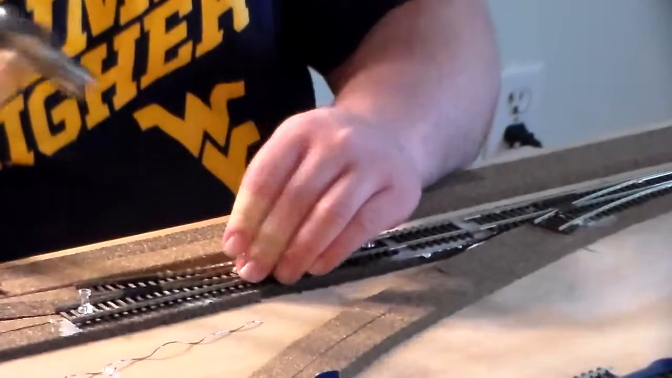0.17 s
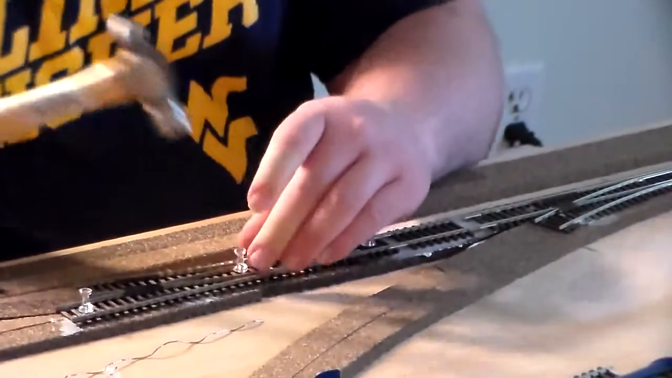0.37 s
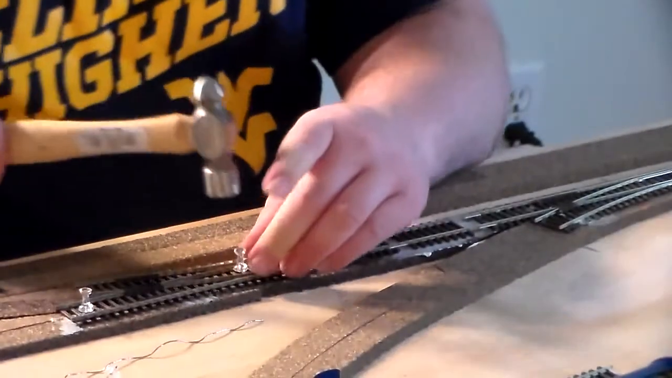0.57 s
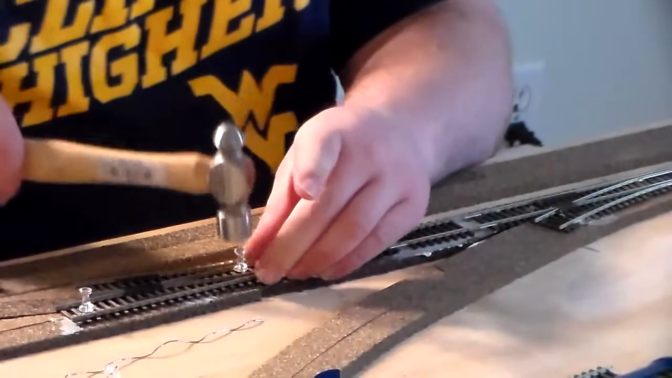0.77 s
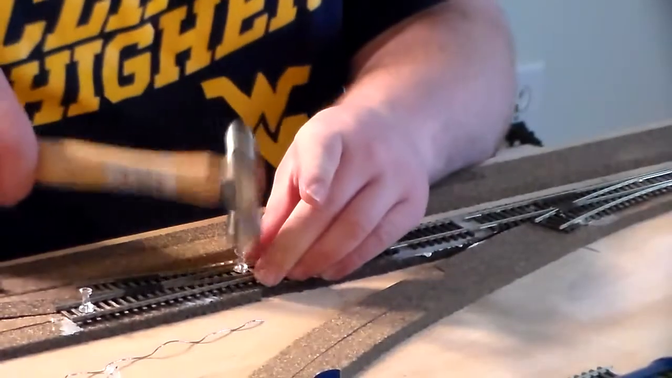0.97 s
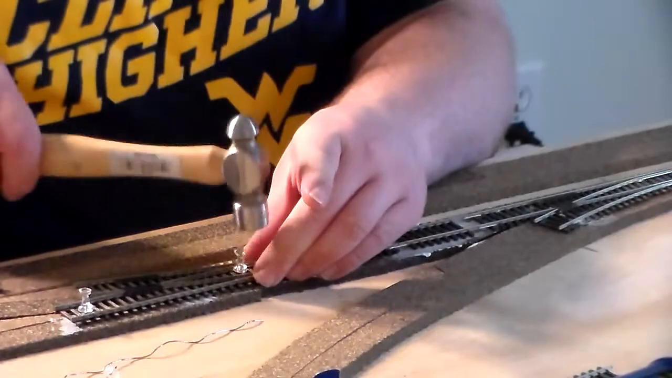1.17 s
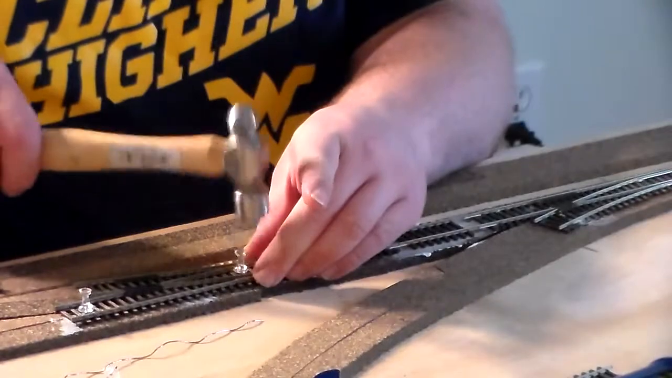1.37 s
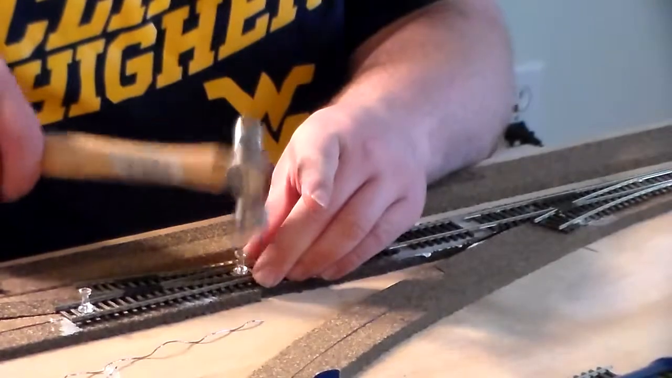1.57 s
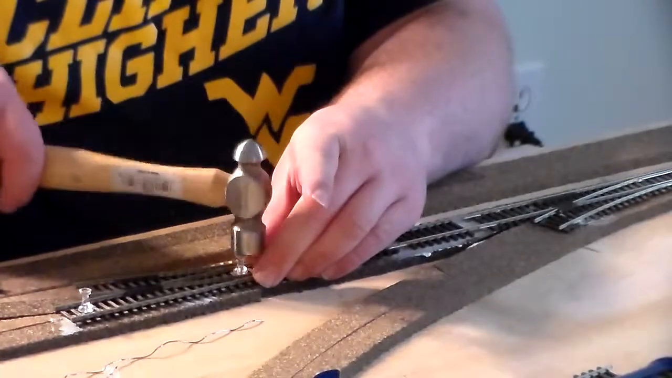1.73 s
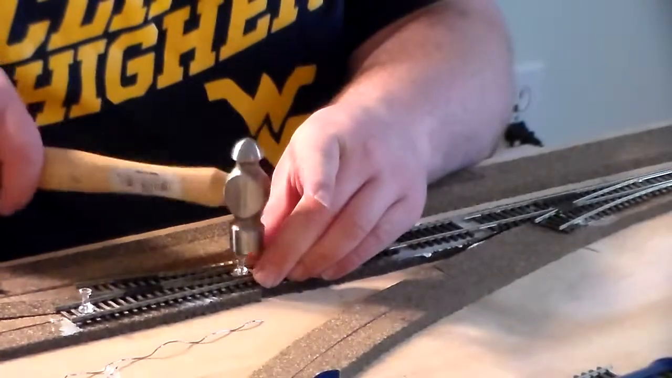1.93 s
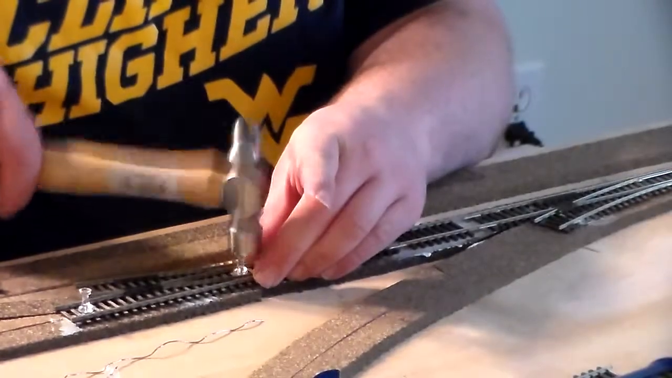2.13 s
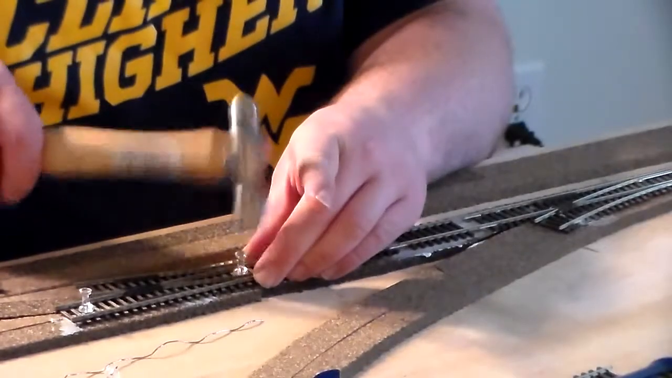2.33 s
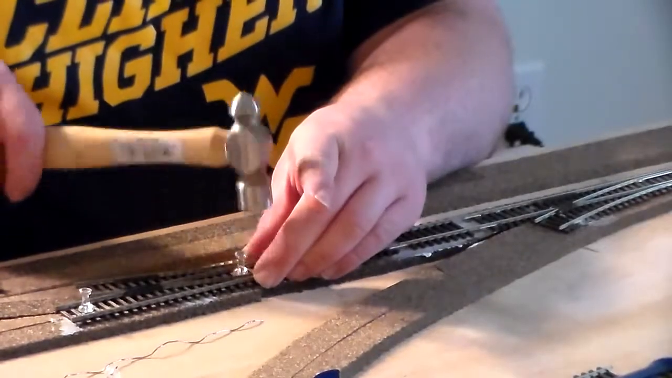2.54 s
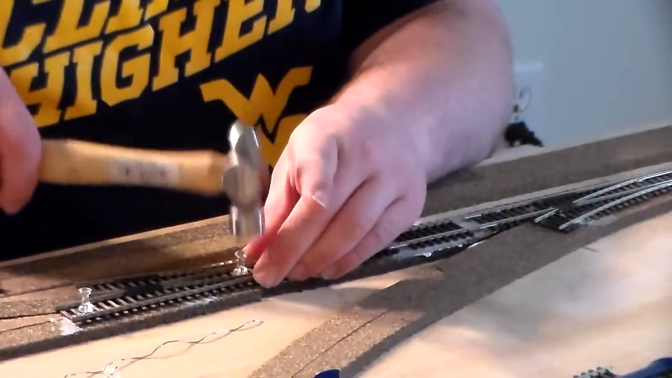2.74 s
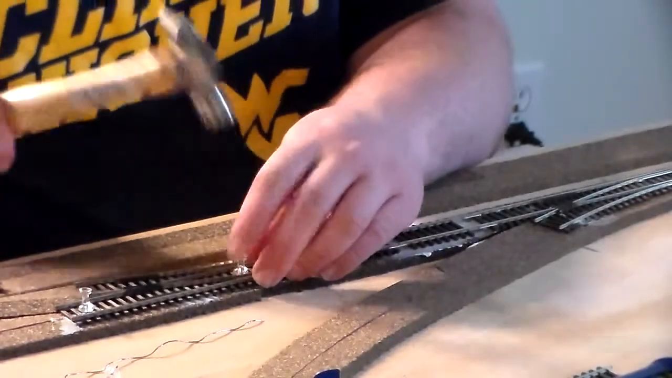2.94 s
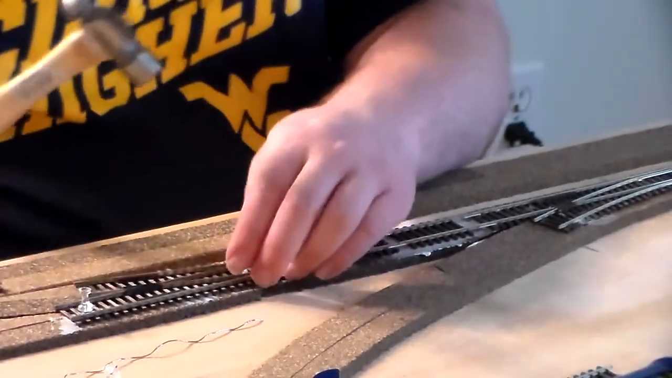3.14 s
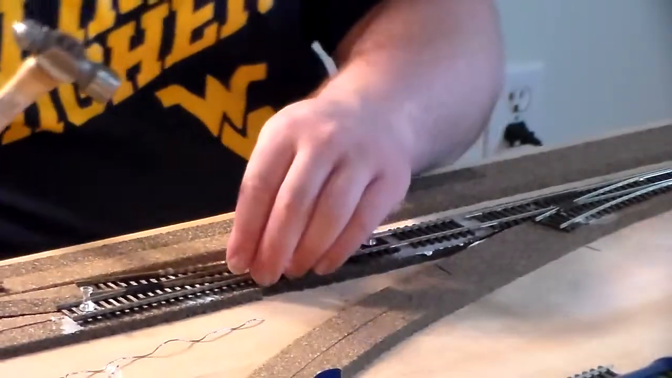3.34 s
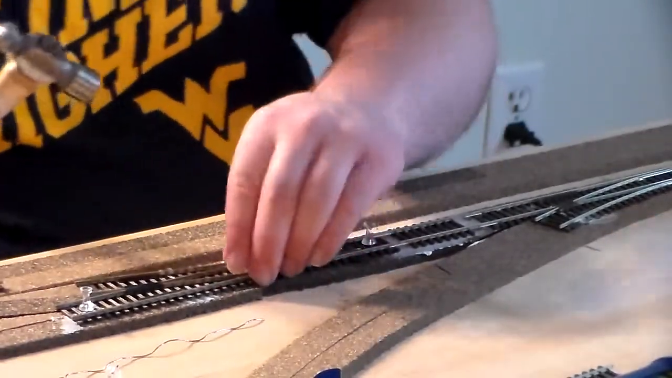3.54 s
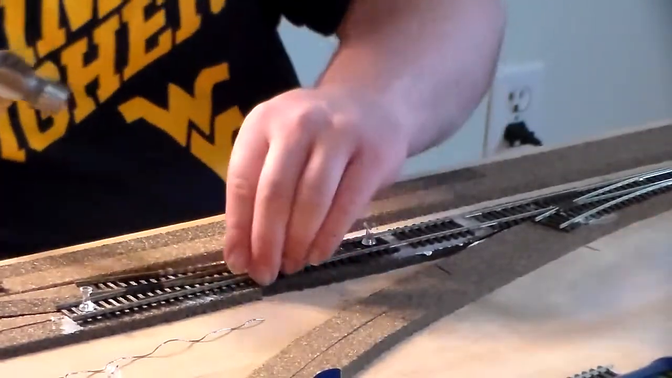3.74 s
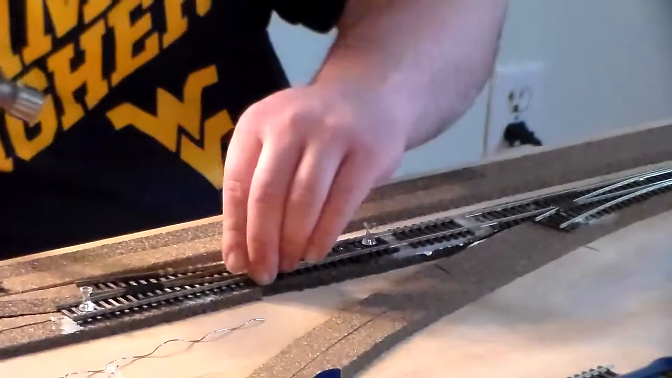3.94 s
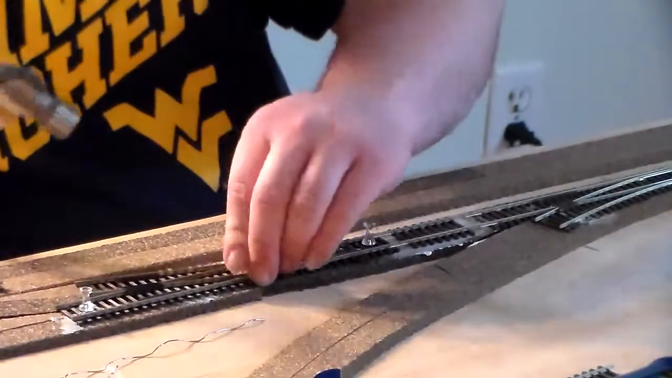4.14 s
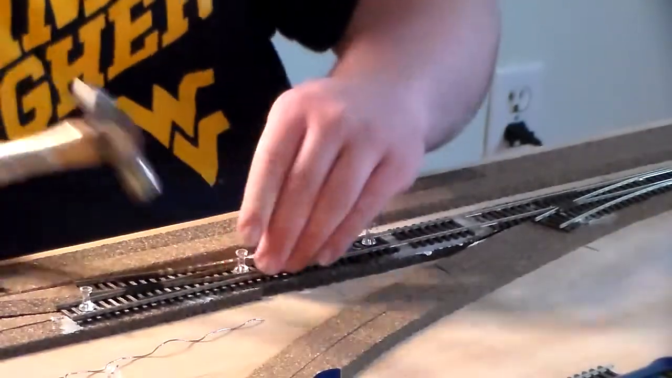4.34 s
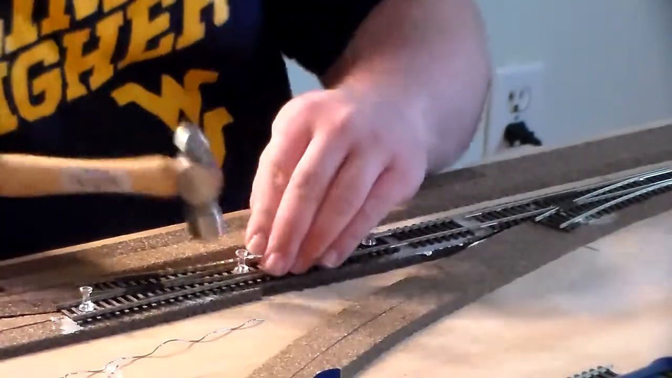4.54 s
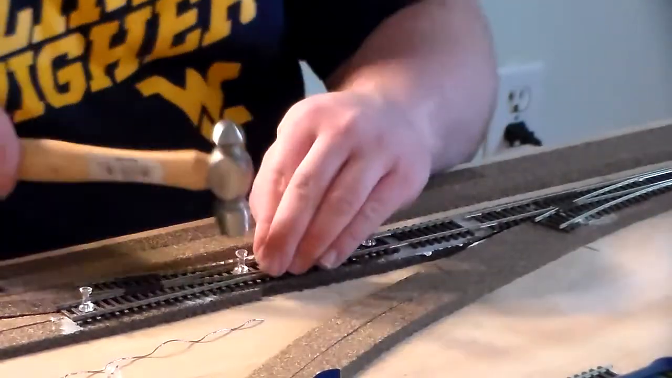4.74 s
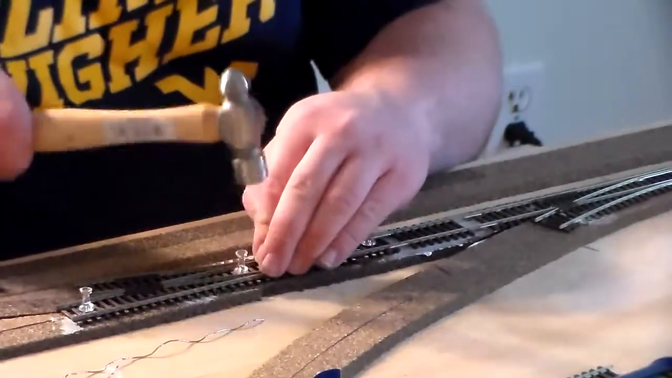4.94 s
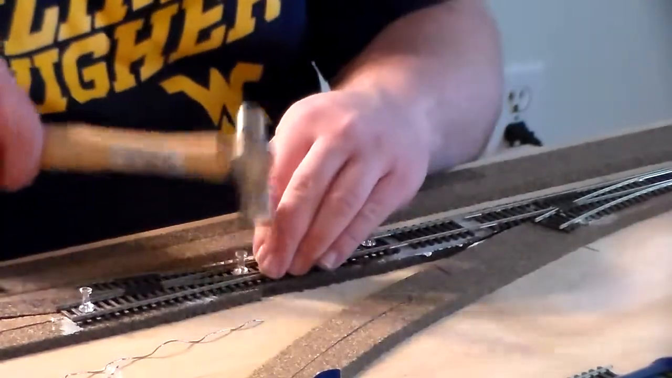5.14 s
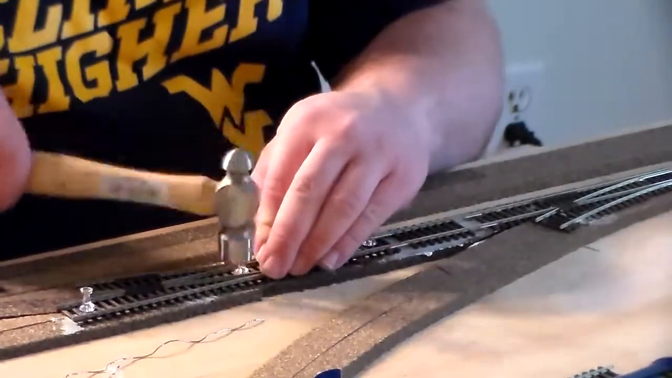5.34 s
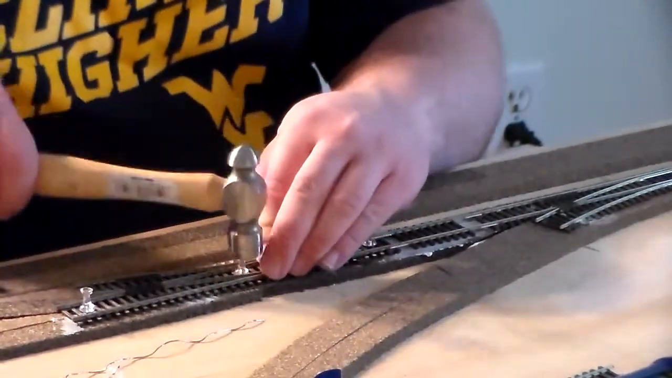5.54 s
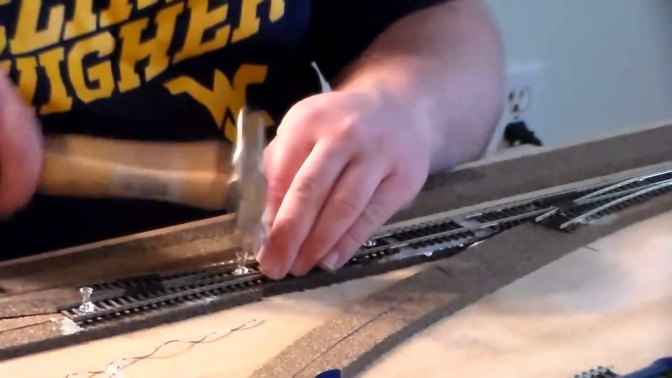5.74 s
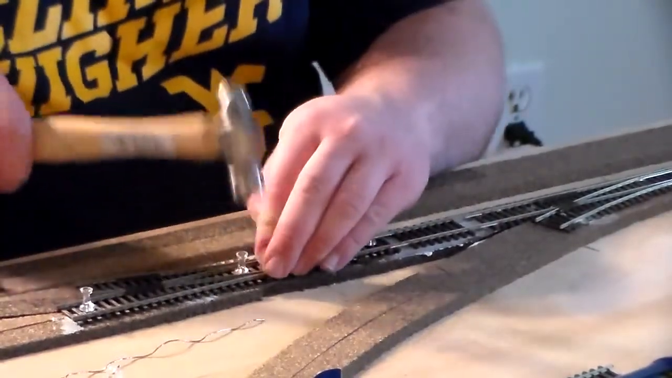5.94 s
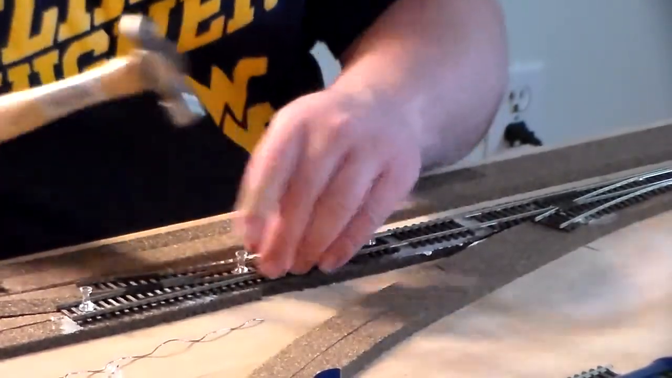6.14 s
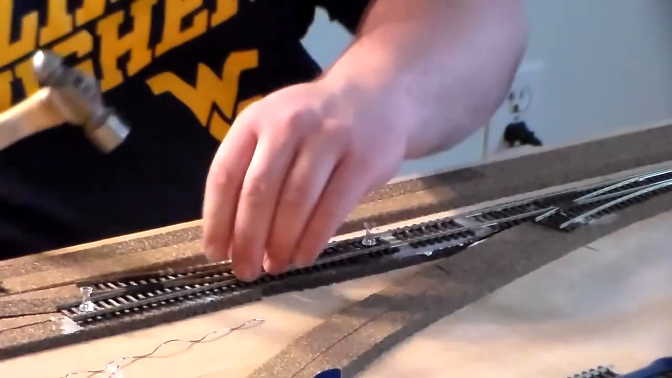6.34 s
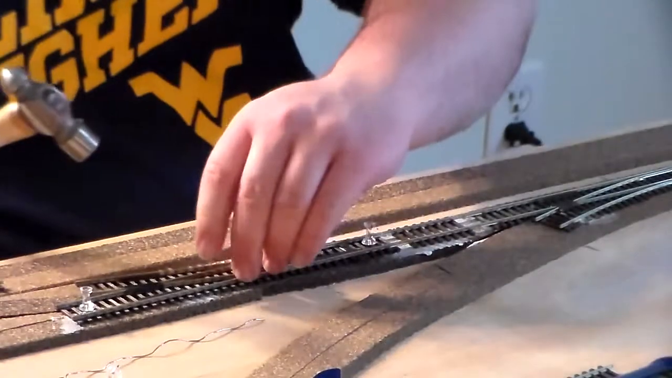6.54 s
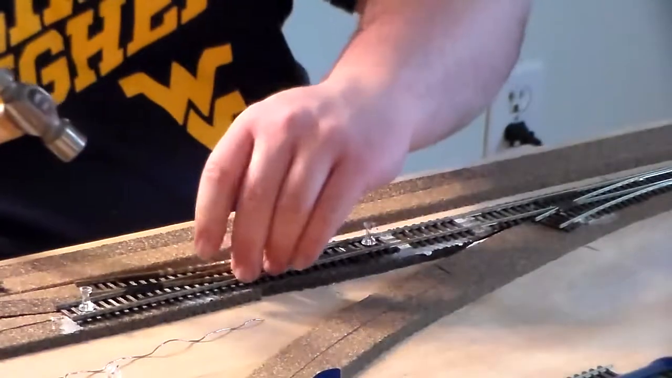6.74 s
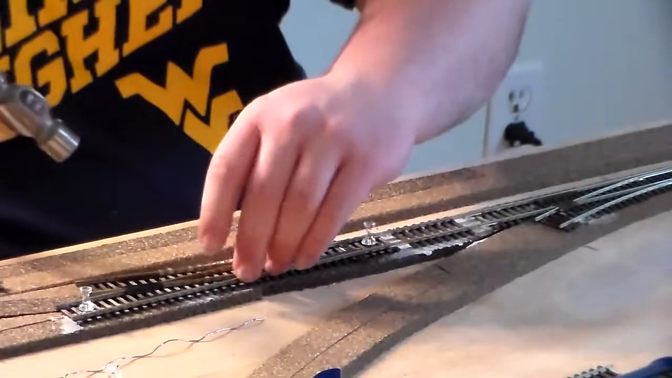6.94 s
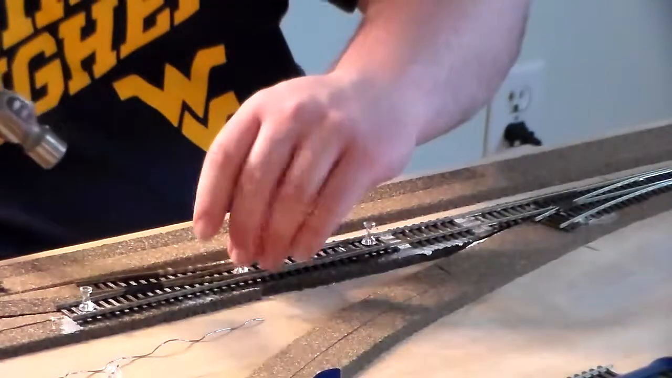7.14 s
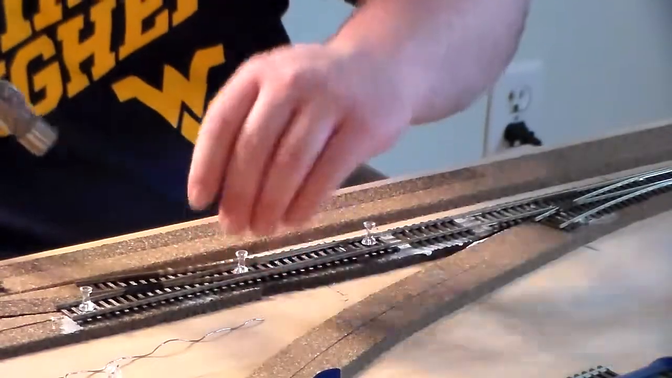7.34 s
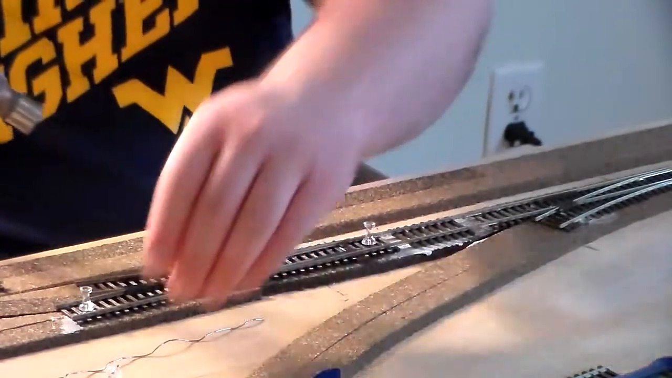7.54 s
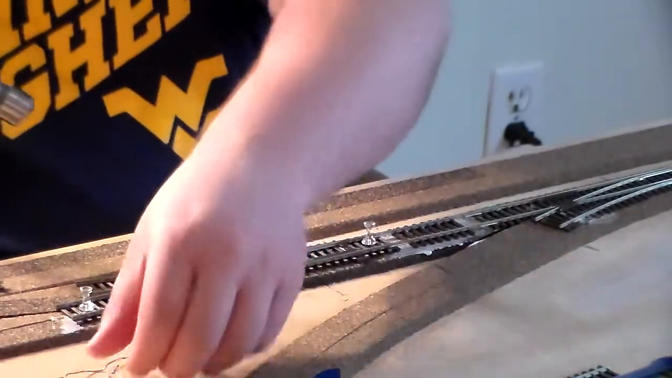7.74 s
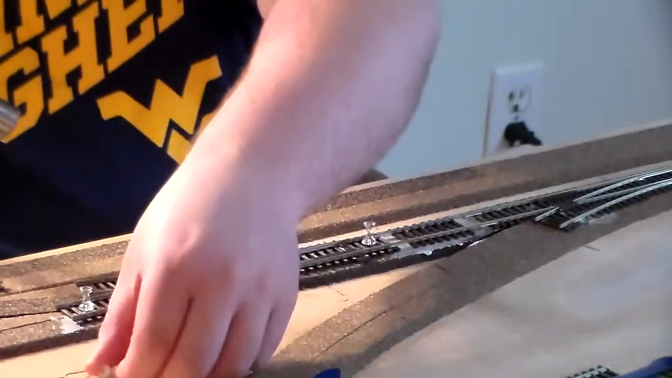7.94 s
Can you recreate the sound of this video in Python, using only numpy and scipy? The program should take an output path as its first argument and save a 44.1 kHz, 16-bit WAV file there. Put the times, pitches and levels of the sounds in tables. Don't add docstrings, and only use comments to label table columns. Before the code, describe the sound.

A small indoor room holds a faint steady low hum, a wavering fan and soft moving air. From 0 to 1 second, fingers quietly flick and scrape a plastic pin on cork. A small steel hammer lands two lighter, duller taps at about 1.2 and 1.4 seconds, with tiny bounces and a rubbing rattle. Six quick, even blows follow from 1.6 to 2.8, each a bright plastic snap over a short hollow plywood thud, with loose clatter, faint metallic ringing and a brief room tail. Around 3.1 come small clicks and a scuff, then near quiet with slight finger noises until 4.8. Four harder blows strike at 5.2, 5.5, 5.7 and 5.9, the third heaviest, the last duller-ticked. A scrape and small clicks at 6.1 give way to hum and air, with a faint flick near 7.8. The close microphone's background ducks after blows and swells back.

```python
import sys
import numpy as np
from scipy import signal
from scipy.fft import rfft, irfft
from scipy.io import wavfile
from scipy.ndimage import uniform_filter1d

SR = 44100
rng = np.random.default_rng(int(sys.argv[2]) if len(sys.argv) > 2 else 0)


def int16_out(signal):
    q = np.round(np.clip(np.atleast_2d(signal).T, -1, 1) * 32767)
    wavfile.write(sys.argv[1], SR, q.astype(np.int16))


def invert_db(x):
    u = np.asarray(x, float) / 20
    return 10 ** u


N = 352956

# [Hz, dB rms]
HUM_PARTIALS = [(119.8, -59), (240.7, -68.5), (363, -73), (485, -75.5), (332, -79.5), (439, -74)]
# [Hz, Hz, dB]
FAN_ORDERS = [
    (29.5, 2.3, -62),
    (59.6, 0.37, -59.5),
    (99.3, 8.5, -90),
]
# [Hz, dB]
AIR_COLOUR = [(12, 3.5), (25, 8.5), (70, -3.5), (150, -6.5), (450, -10), (700, -15.5), (1200, -18),
              (2500, -21), (5000, -24.5), (15000, -32.5)]
# [Hz, 0 to 1]
AIR_LIKENESS = [(60, 0.71), (180, 0.69), (540, 0.6), (1640, 0.36), (4950, 0.034), (14900, 0.0)]
# [Hz, dB]
STEREO_LEAN = [(60, 1.5), (240, 0.5), (950, 0), (3750, -1.5), (14900, -0.5)]
# [Hz, s]
ROOM_DECAY = [(150, 0.47), (400, 0.35), (1000, 0.33), (2500, 0.37), (6000, 0.37), (12000, 0.31)]

# [s, dB, dB, dB, dB]
FIRST_TAPS = [
    (1.1629, -31.5, -54, 3.5, 16.6),
    (1.4014, -27, -54, 11, 13),
]
FIRST_PIN = [(1.6182, -23, -18, 3.5, -6.5), (1.8572, -24.5, -17.5, 5.5, -6), (2.0898, -23, -19.5, 5, -3.5),
             (2.318, -22, -19.5, 3, -1), (2.5469, -21, -19, 2, 5), (2.7702, -22.5, -19, 0.5, 6)]
SECOND_PIN = [
    (5.1966, -21, -16.5, -1.5, 3.1),
    (5.4603, -16, -16.5, -8.5, 2.1),
    (5.7002, -12, -14, -9, 3.2),
    (5.9264, -15, -24, -5.5, 2.5),
]
# [Hz, dB per Hz]
CLATTER_TAPS = [(59, -44), (100, 24.5), (345, 3), (502, 17), (923, -1.5), (2050, -25), (2470, -44),
                (3250, -23.5), (12400, -40.5), (14100, -39), (15000, -80)]
CLATTER_FIRST = [(59, -37), (100, 23), (184, 3), (416, 7.5), (923, -20.5), (1660, -24.5), (2370, -30),
                 (2800, -27.5), (11200, -52), (14100, -55), (15000, -85)]
CLATTER_SECOND = [(59, -32), (100, -16), (140, 3.5), (324, 10), (492, 16.5), (780, -11.5), (3530, -24),
                  (7670, -38), (10300, -38), (13200, -43), (15000, -75)]
# [Hz, dB, s]
PLYWOOD_MODES = [(165.5, -1.5, 0.27), (194.6, -4.5, 0.16), (199.9, 1, 0.2), (218.2, -0.5, 0.14),
                 (235, -8.5, 0.25), (276, -7, 0.24), (299.6, -2.5, 0.19), (341, -7, 0.23), (378, 2, 0.18),
                 (406.6, 3, 0.22), (422, -6.5, 0.35), (461.6, 2, 0.19), (511.3, -2, 0.19),
                 (527.3, -5, 0.29), (551, -17, 0.19), (566, -16, 0.39), (593, -44, 1), (662, -29, 0.67),
                 (651, -15, 0.4), (657, -11, 0.18), (706, -5, 0.18), (751, -16, 0.43), (845, -20.5, 0.3),
                 (857, -18, 0.26), (946, -17.5, 0.24)]
# [Hz, dB, s]
KNOCK_MODES = [(400, -5, 0.028), (2530, 1, 0.00075)]
# [Hz, dB, s]
HEAD_MODES = [(5465, 4, .35), (5515, 2, .2), (5552, -2, .8), (5615, 3, .3), (4620, 0, .2), (4735, 0, .45)]
# [s, dB]
HEAD_RINGS = [(1.618, -60), (1.856, -49.5), (2.091, -46.5), (2.317, -56), (2.547, -54), (2.771, -53),
              (5.197, -50.5), (5.461, -55), (5.699, -50), (5.925, -49)]
# [s, Hz]
ECHOES = [(.0024, 3700), (.0038, 10500), (.0058, 2900)]
ECHO_LEVELS = [-13, -26, -10]

# [s, dB, Hz]
BOUNCES = [(1.1612, -39, 3600), (1.1652, -34, 4000), (1.3988, -33, 3900), (1.4025, -48, 9500),
           (1.6192, -37, 4200), (5.4608, -44, 11500), (5.4627, -35, 3900), (5.4643, -38, 12500),
           (5.466, -33, 2800), (5.9266, -32, 3000), (5.4665, -44, 11000), (3.085, -52, 4500),
           (3.0955, -43, 3000), (4.5685, -55, 4000), (6.123, -50, 4400), (6.1355, -47, 4200)]
# [s, Hz, dB]
RAIL_BUZZES = [(1.405, 1920, -35), (1.41, 3380, -39), (1.625, 3700, -36), (1.87, 2960, -33),
               (2.1, 3120, -34), (2.1, 4650, -41), (2.325, 3520, -35), (2.78, 2800, -34.5),
               (2.78, 3800, -39), (5.21, 3470, -31.5), (5.72, 3330, -30), (5.72, 4780, -50),
               (5.94, 3380, -41)]
# [s, Hz, Hz, dB]
RUBS = [(0, 1380, 800, -59.5), (.97, 603, 500, -56), (1.16, 1670, 2450, -32.5), (1.3974, 1800, 2480, -29.5),
        (3.75, 550, 200, -58.5), (4.57, 875, 700, -58.5), (6.125, 4400, 499, -63), (6.124, 1290, 1200, -50),
        (6.275, 3200, 2500, -61.5), (6.319, 2800, 2500, -64.5), (1.869, 4500, 2500, -36.5),
        (7.98, 604, 400, -56)]
# [s, dB, Hz, Hz, dB]
FLICKS = [(.024, -52, 3630, 1500, -16), (.54, -68, 3700, 1000, -3), (0.609, -66, 9000, 6000, -7),
          (0.843, -62.5, 3480, 5000, 6), (0.999, -61, 1500, 5000, 2.5), (3.295, -56, 2510, 2000, -15),
          (3.743, -69, 2000, 7900, 7), (4.567, -59, 2470, 4000, -9.5), (4.79, -63, 9000, 7000, -7),
          (7.77, -66.5, 4340, 6000, 5)]
# [s, dB, Hz, Hz, dB]
SCRAPES = [(0.945, -62.5, 3440, 700, 6), (0.972, -61, 3320, 805, 5), (3.063, -55, 3500, 3020, -5),
           (3.084, -50, 3030, 3950, 5.5), (6.123, -44.5, 3070, 2880, 1.5), (6.72, -64, 1000, 2000, -3)]

# dip_db, recovery_per_s [dB, 1/s]; a negative recovery sinks further
DUCKS = [(7.5, 5.5), (8.5, 4), (7.5, 0), (6.5, -0.7), (8, 8.), (10.5, 9), (11, 13), (14, 20.5), (10, 0.1),
         (11.5, 0.1), (18, 13), (18.5, 16.5)]
# [s, dB]
RESTING_GAIN = [(0, 2), (1.16, 5), (3.0, 3), (6.2, 2), (8.1, 1.7)]

AIR_DB, HISS_DB, CONVERTER_HISS_DB, SHAKE_DB = -56, -73, -74.5, -59.5
EDGE_HZ = 14220
CLATTER_DB, CLATTER_PER_THUD = -9.0, 0.77
BLOW_DB, BOUNCE_DB = 5.0, 13
RAIL_WIDTH_HZ = 300
FLICK_RISE_S, SCRAPE_RISE_S = 0.0028, 0.009
DUCK_WAIT_S, DUCK_FALL_S = 0.0014, 0.011
HEAD_RING_S = 0.36
SATURATION = 0.22


def evened(x):
    return x / np.sqrt(np.mean(x ** 2) + 1e-20)


def read(points, hz):
    f, value = np.transpose(points)
    return np.interp(np.log(hz + 1), np.log(f + 1), value)


def add(mix, s, sound):
    part = mix[:, round(s * SR):][:, :sound.shape[-1]]
    part += sound[..., :part.shape[1]]


def smoothed(noise, width, height):
    return evened(uniform_filter1d(uniform_filter1d(noise, width, 0), height, 1))


def wavering(noise, width):
    return evened(uniform_filter1d(uniform_filter1d(noise, width), width))


def resonance_db(hz, centre_hz, width_hz, slope):
    return -slope * np.log10(1 + ((hz - centre_hz) / width_hz * 2) ** 2)


def pair(gain, likeness, size):
    a, b, c, d = rng.standard_normal((gain.shape[1], gain.shape[0], 4)).T
    likeness = np.clip(likeness, 0, 1)[:, None]
    left = a + 1j * b
    right = likeness * left + np.sqrt(1 - likeness ** 2) * (c + 1j * d)
    spectra = np.array([left, right]) * gain
    return signal.istft(spectra, nperseg=size, noverlap=size * 3 // 4)[1]


def steady(colour_db, likeness, patchy_db):
    patches = smoothed(rng.standard_normal((N // 512 + 5, 1025)), 20, 6).T
    gain = invert_db(colour_db[:, None] + patchy_db * patches)
    return evened(pair(gain, likeness, size=2048)[:, :N])


def tail(colour_db, slower, likeness):
    hz = np.fft.rfftfreq(256, 1 / SR)
    t = np.arange(400) * 64 / SR
    fall_db = -60 * t / (slower * read(ROOM_DECAY, hz)[:, None])
    patches = smoothed(rng.standard_normal((400, 129)), 12, 3).T
    uneven_db = 1.8 * patches + 1.5 * rng.standard_normal((129, 1))
    gain = invert_db(colour_db(hz)[:, None] + fall_db + uneven_db)
    out = pair(gain, likeness / (1 + (hz / 7000) ** 2), size=256)
    return out / np.sqrt(np.mean(out[:, :882] ** 2))


def ring(modes, spread_db):
    t = np.arange(SR * 6 // 10) / SR
    hz, db, t60 = np.transpose(modes)[:, :, None]
    luck = rng.standard_normal((len(modes), 2))
    turns = hz * (1 + 0.002 * luck[:, 1:]) * t
    sign = np.where(np.arange(len(modes)) % 3 == 2, -1, 1)[:, None]
    level = invert_db(db + spread_db * luck[:, :1] - 60 * t / t60)
    return (sign * level * np.sin(2 * np.pi * turns)).sum(0)


def blow_times():
    return [row[0] for row in FIRST_TAPS + FIRST_PIN + SECOND_PIN]


def air():
    hz = np.fft.rfftfreq(2048, 1 / SR)
    colour_db = read(AIR_COLOUR, hz) - 60 * (hz > EDGE_HZ)
    return invert_db(AIR_DB) * steady(colour_db, read(AIR_LIKENESS, hz), 0.92)


def hum_and_fan():
    t = np.arange(N) / SR
    out = np.zeros(N)
    for hz, db in HUM_PARTIALS:
        level = np.sqrt(2) * invert_db(db + wavering(rng.standard_normal(N), 4000))
        out += level * np.sin(2 * np.pi * (hz * t + rng.random()))
    bins = np.fft.rfftfreq(N, 1 / SR)
    for hz, width_hz, db in FAN_ORDERS:
        band = 1 + (2 * (bins - hz) / width_hz) ** 2
        out += invert_db(db) * evened(irfft(rfft(rng.standard_normal(N)) / band, N))
    return out * invert_db([[0.2], [-0.2]])


def floor_shake():
    t = np.arange(N) / SR
    sway = np.zeros(N)
    for s in blow_times():
        since = np.clip(t - s, 0, 9)
        sway += since * 25 * np.exp(1 - since * 12)
    band = signal.butter(2, [25, 95], "band", fs=SR, output="sos")
    return invert_db(SHAKE_DB) * sway * evened(signal.sosfilt(band, rng.standard_normal(N)))


def scuff(row, rise_s):
    s, db, centre_hz, width_hz, room_db = row
    wash = tail(lambda hz: resonance_db(hz, centre_hz, width_hz, 12), 0.86, 0.92)
    u = np.arange(wash.shape[1]) / SR / rise_s
    grains = rng.exponential(1, len(u) // 20 + 1).repeat(20)[:len(u)]
    grit = invert_db(1.9 * grains - 11.5) * u * np.exp(1 - u) * 0.29
    room = invert_db(room_db + 1.5) * np.minimum(u, 1)
    return s, invert_db(db) * wash * (grit + room)


def rub_or_buzz(row):
    s, centre_hz, width_hz, db = row
    buzz = tail(lambda hz: resonance_db(hz, centre_hz, width_hz, 20), 0.67, 1.0)
    swell = 1 - np.exp(-np.arange(buzz.shape[1]) / SR / 0.0059)
    return s, invert_db(db) * buzz * swell


def hammer_head(row):
    s, db = row
    t = np.arange(round(HEAD_RING_S * SR)) / SR
    blur = 1 + 0.9 * wavering(rng.standard_normal((2, len(t))), 150)
    lift_off = 1 - np.exp(-t / 0.02)
    fade = np.minimum(12 * (HEAD_RING_S - t), 1)
    return s, invert_db(db) * blur * ring(HEAD_MODES, 1.5)[:len(t)] * lift_off * fade


def tick(db, hz, cycles):
    u = np.arange(300) / SR * hz / cycles
    snap = np.sin(2 * np.pi * u * cycles) * (u * np.exp(1 - u)) ** 2
    edge = np.diff(np.exp(-(u * cycles - 1.5) ** 2 * 18), prepend=0)
    return invert_db(db - 1) * (snap + 0.16 * edge)


def small_tick(db, hz):
    return tick(db, hz, 1.4 * np.sqrt(hz / 3500))


def plywood_thud(low_db, high_db):
    modes = []
    for hz, db, t60 in PLYWOOD_MODES:
        balance_db = low_db * (hz < 340) + high_db * ((450 < hz < 620) - 0.7 * (hz > 620))
        modes.append((hz, db + balance_db, t60))
    thud = ring(modes, 1.5)
    return thud / np.sqrt(np.mean(thud[:882] ** 2)) + ring(KNOCK_MODES, 0.29)


def clatter_wash(colour):
    wash = tail(lambda hz: read(colour, hz) - 20 / (1 + (hz / 750) ** 4), 0.9, 0.95)
    return wash * (1 - 0.82 * np.exp(-np.arange(wash.shape[1]) / SR / 0.0089))


def blow(row, clatter):
    s, thud_db, tick_db, low_db, high_db = row
    out = np.zeros((2, SR * 6 // 10))
    add(out, 0.0005, invert_db(thud_db) * plywood_thud(low_db, high_db))
    add(out, 0, tick(tick_db, 4050 * rng.uniform(0.97, 1.02), 1.4))
    for (delay_s, hz), db in zip(ECHOES, ECHO_LEVELS):
        add(out, delay_s, small_tick(tick_db + db, hz))
    add(out, 0.001, invert_db(CLATTER_DB + CLATTER_PER_THUD * thud_db) * clatter_wash(clatter))
    return s, out * invert_db(BLOW_DB)


def radiated(table):
    thin_ply = signal.butter(6, 135, "high", fs=SR, output="sos")
    lean_db = read(STEREO_LEAN, np.fft.rfftfreq(N, 1 / SR))
    return irfft(rfft(signal.sosfilt(thin_ply, table)) * invert_db(np.outer([0.5, -0.5], lean_db)), N)


def scene():
    table = np.zeros((2, N))
    for rows, rise_s in ((FLICKS, FLICK_RISE_S), (SCRAPES, SCRAPE_RISE_S)):
        for row in rows:
            add(table, *scuff(row, rise_s))
    buzzes = [(s, hz, RAIL_WIDTH_HZ, db) for s, hz, db in RAIL_BUZZES]
    for row in RUBS + buzzes:
        add(table, *rub_or_buzz(row))
    for row in HEAD_RINGS:
        add(table, *hammer_head(row))
    for s, db, hz in BOUNCES:
        add(table, s, small_tick(db + BOUNCE_DB, hz))
    series = ((FIRST_TAPS, CLATTER_TAPS), (FIRST_PIN, CLATTER_FIRST), (SECOND_PIN, CLATTER_SECOND))
    for rows, clatter in series:
        for row in rows:
            add(table, *blow(row, clatter))
    return air() + hum_and_fan() + floor_shake() + radiated(table)


def gain_db():
    t, dip_db = np.arange(N) / SR, np.zeros(N)
    for s, (db, recovery) in zip(blow_times(), DUCKS):
        since = np.maximum(t - s - DUCK_WAIT_S, 0)
        taken = np.minimum(since / DUCK_FALL_S, 1)
        dip_db = (1 - taken) * dip_db + taken * db * np.exp(-since * recovery)
    return np.interp(t, *np.transpose(RESTING_GAIN)) - dip_db


def saturated(x):
    low = signal.oaconvolve(x, signal.firwin(101, 1500, fs=SR)[None], "same")
    squash = SATURATION * np.tanh(low / SATURATION) - low
    no_bass = signal.butter(2, 130, "high", fs=SR, output="sos")
    return x + signal.sosfiltfilt(no_bass, squash)


def band_edge(x):
    lift = 1 + 0.5 * (np.fft.rfftfreq(N, 1 / SR) / 14000) ** 12
    lifted = irfft(rfft(x) * np.minimum(lift, 1.6), N)
    edge = signal.firwin(63, 14300, window=("kaiser", 5), fs=SR)
    return signal.oaconvolve(lifted, edge[None], "same")


def band_limit(x):
    return signal.sosfilt(signal.butter(12, 15500, fs=SR, output="sos"), x)


def record(dry):
    hz = np.fft.rfftfreq(2048, 1 / SR)
    hiss_db = -30 / (1 + (hz / 2000) ** 2) - 60 * (hz > EDGE_HZ)
    before = dry + invert_db(HISS_DB) * steady(hiss_db, 0.044 + 0 * hz, 0.38)
    after = saturated(before * invert_db(gain_db()))
    after = after + invert_db(CONVERTER_HISS_DB) * steady(hiss_db, 0.05 + 0 * hz, 0.5)
    mix = band_edge(after)
    return band_limit(mix)


dry = scene()
out = record(dry)
int16_out(out)
```